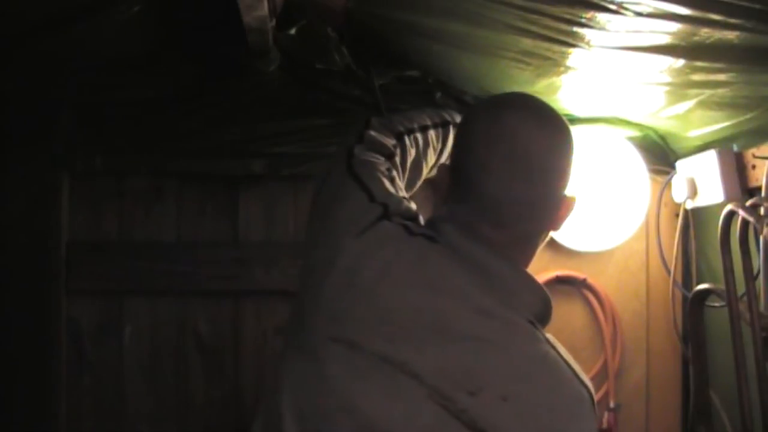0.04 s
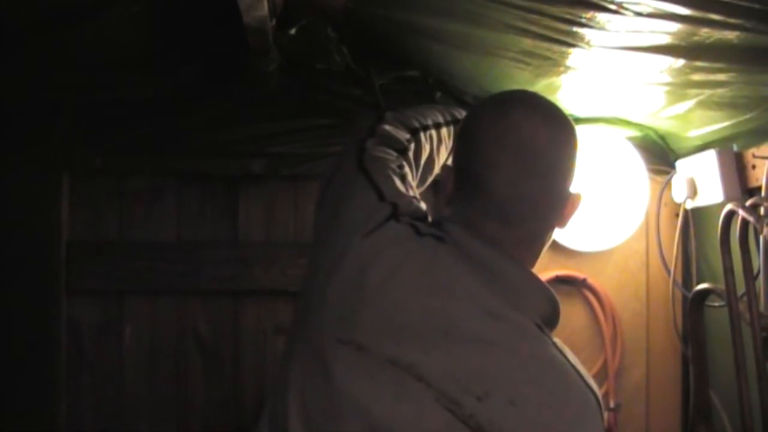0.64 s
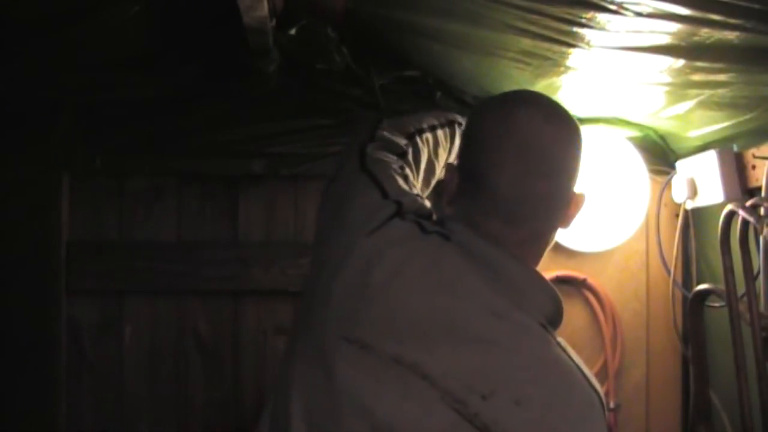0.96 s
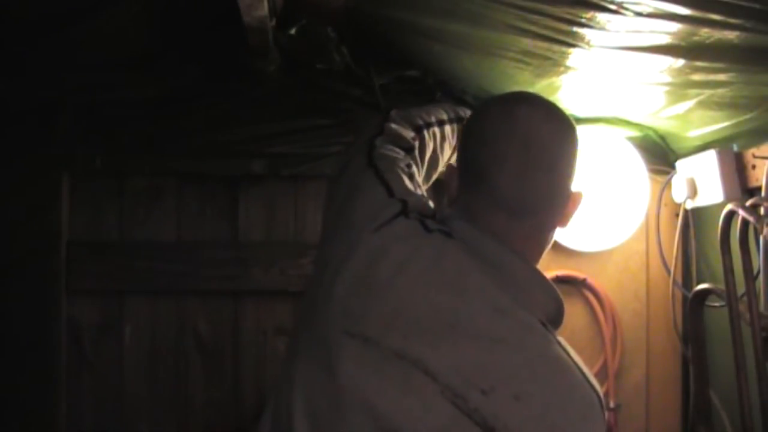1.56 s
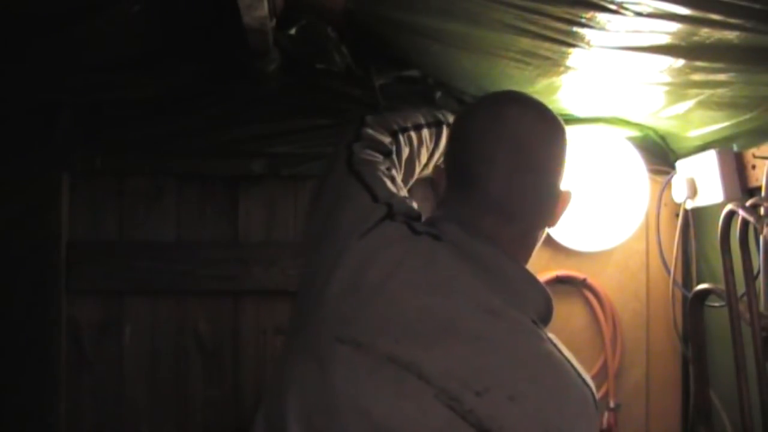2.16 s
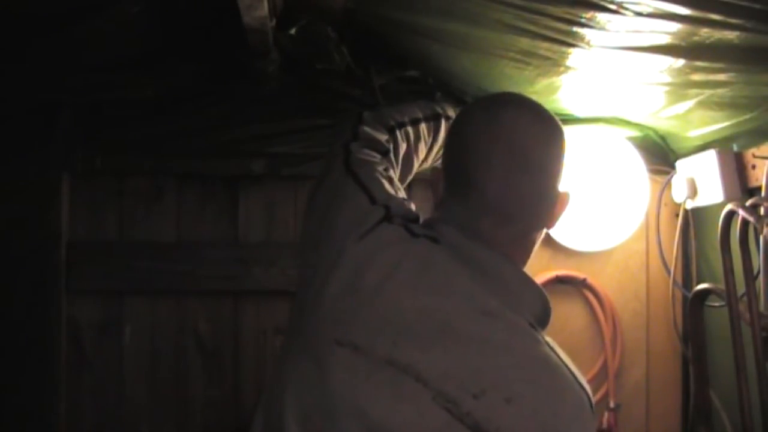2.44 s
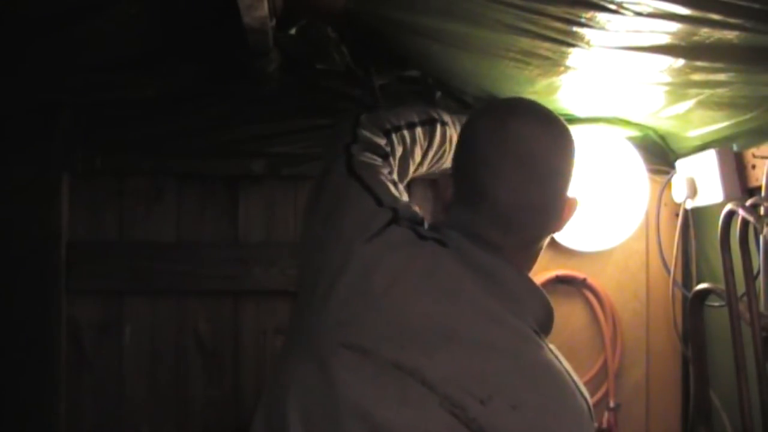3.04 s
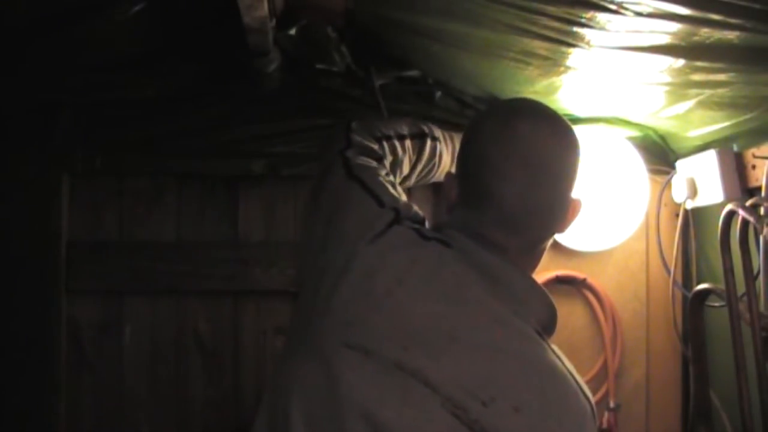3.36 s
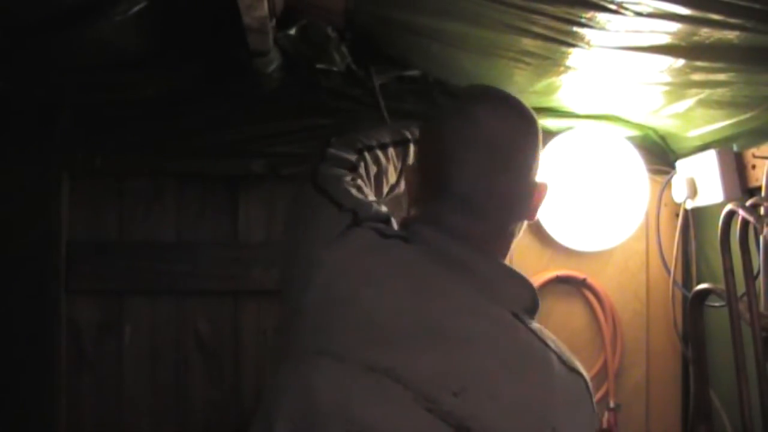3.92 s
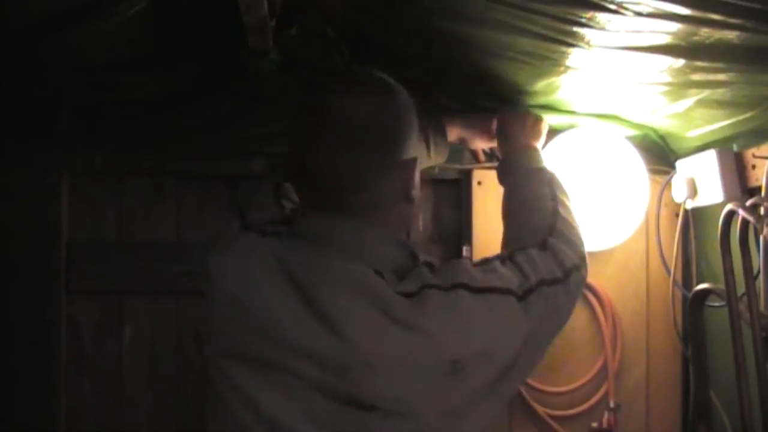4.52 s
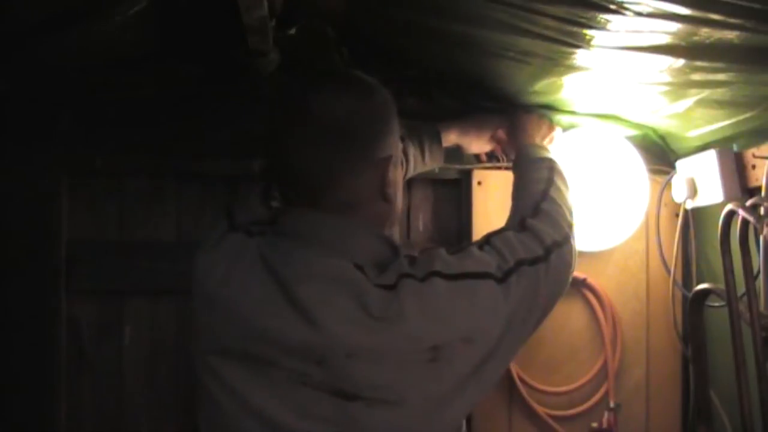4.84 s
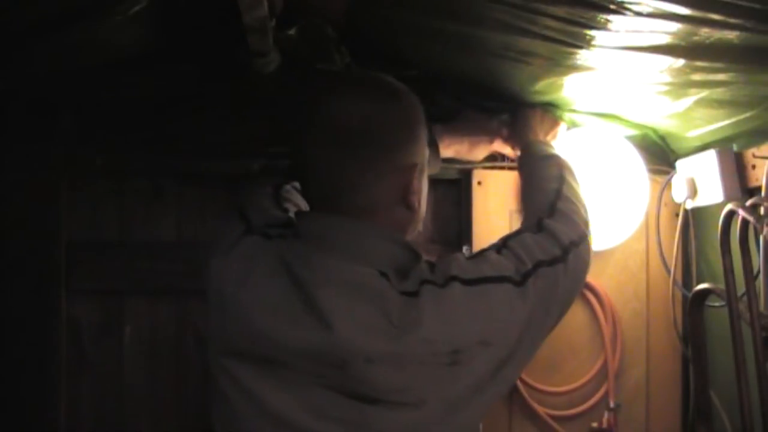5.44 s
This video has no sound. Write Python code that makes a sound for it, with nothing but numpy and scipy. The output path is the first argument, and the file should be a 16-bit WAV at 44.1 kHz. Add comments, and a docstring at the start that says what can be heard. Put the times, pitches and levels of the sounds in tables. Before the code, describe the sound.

Quiet, uneven rustling of clothing and cables sliding over plastic lining is heard from nearby inside a cramped wooden shed, dotted with small taps and faint scrapes. Past the middle comes one loud knock on the boards, followed by a busy run of sharp clicks and lighter knocks as wires spring against a plastic box. A soft hiss of still air and a barely audible high whine lie underneath.

```python
"""Someone works on cables under the roof of a small wooden shed lined with plastic sheeting.
At first, sliding friction: a jacket swishes, hands and cables rub the lining, amid light bumps and ticks.
Near 3.9 s a hard bump sets the modes of the boards ringing. Then, to the end, wires snap in quick
succession against a plastic box, each a sudden release that excites a resonance.
Throughout, the shed reverberates briefly and the equipment whines faintly over still air."""
import sys
import numpy as np
from scipy import signal
from scipy.fft import rfft, irfft
from scipy.io import wavfile

SR = 44100
rng = np.random.default_rng(int(sys.argv[2]) if len(sys.argv) > 2 else 0)


def pcm_store(signal):
    """Save signal as 16-bit PCM."""
    levels = np.round(np.clip(np.atleast_2d(signal), -1, 1) * 32767)
    wavfile.write(sys.argv[1], SR, levels.astype(np.int16).T)


N = 246519
TIME = np.arange(N) / SR


def rustle():
    """Sliding friction: cloth and sheeting hiss, cables rasp on the lining and rumble in the boards."""
    # spectrum of each kind of friction: frequency_hz, relative_db
    swish_colour = [(600, -23), (1500, -0.5), (2800, -2), (4000, -1), (5300, -0.5), (7000, -2.5),
                    (10000, -2), (12000, -6.5), (13500, -14), (16000, -23)]
    rub_colour = [(200, -24), (330, -18), (400, -7), (520, 2), (660, 3), (800, 0), (980, 1.5), (1150, -1.5),
                  (1400, 0), (2000, -5), (3200, -5.5), (6000, -40)]
    drag_colour = [(20, -48), (50, -43), (100, -7), (160, -6.5), (215, 1.5), (270, 4), (320, -8),
                   (385, 12.5), (480, -14), (800, -19)]
    swish = from_db(1.58) * friction(effort(0), swish_colour, slips_per_s=24000, spread_db=0)
    rub = from_db(-3) * friction(effort(1), rub_colour, slips_per_s=1500, spread_db=-0.5)
    drag = from_db(-4) * friction(effort(2), drag_colour, slips_per_s=1000, spread_db=-0.5)
    return swish + shed(rub + drag, wet_db=1)


def effort(layer, swell_shape=1.68):
    """Incoherent addition: arm movements sum in power to one layer's gain (0 swish, 1 rub, 2 drag)."""
    # arm movements, relative levels: peak_s, rise_s, fall_s, swish_db, rub_db, drag_db
    strokes = [(0.03, .15, 0.11, -54.5, -50.5, -56.5), (0.086, 0.023, 0.046, -46.5, -51, -75),
               (0.25, 0.13, 0.22, -53.5, -55.5, -60), (0.56, 0.038, 0.045, -49, -55.5, -68),
               (0.63, 0.034, .09, -52, -51.5, -62), (0.821, 0.14, .075, -56.5, -58, -63),
               (1.12, .13, 0.061, -47, -49.5, -56.5), (1.22, .04, .04, -50, -54, -57.5),
               (1.57, 0.23, 0.065, -48.5, -49, -54), (1.744, .02, .04, -50.5, -53, -44.5),
               (1.83, .05, .05, -57, -53.5, -64), (1.93, 0.062, 0.1, -47, -51, -60.5),
               (2.17, 0.069, 0.095, -52.5, -48, -51), (2.322, 0.064, 0.11, -50, -47, -50.5),
               (2.51, 0.092, 0.05, -47.5, -46, -58), (2.701, 0.069, 0.047, -58, -55.5, -55),
               (2.99, 0.095, 0.13, -58.5, -57.5, -68), (3.219, 0.041, 0.054, -55, -53.5, -51.5),
               (3.33, 0.059, 0.12, -47.5, -52.5, -60.5), (3.438, 0.039, .04, -51.5, -47, -62),
               (3.55, 0.091, 0.12, -42.5, -54.5, -59), (3.882, 0.15, 0.064, -39, -46.5, -53),
               (4.03, .03, .07, -64, -52.5, -63), (4.25, 0.16, 0.23, -56, -52, -67),
               (4.6, 0.19, 0.082, -57, -69, -79.5), (4.8, 0.064, 0.15, -42.5, -45, -63),
               (5.222, 0.081, .09, -45.5, -42.5, -63), (5.42, 0.071, 0.13, -53, -48, -57.5)]
    # slight motion between them, relative levels: swish_db, rub_db, drag_db
    fidget_db = (-66.5, -64, -77.5)
    power = from_db(fidget_db[layer]) ** 2
    for peak_s, rise_s, fall_s, *levels_db in strokes:
        from_peak = np.abs(TIME - peak_s) / np.where(TIME < peak_s, rise_s, fall_s)
        swell = np.exp(-np.minimum(from_peak ** swell_shape, 20))   # a bell, pointed for shapes below 2
        power = power + (from_db(levels_db[layer]) * swell) ** 2
    return np.sqrt(power)


def friction(gain, colour, slips_per_s, spread_db):
    """Stick-slip: sliding is a shower of tiny uneven slips; firmer movement makes more of them."""
    chance = np.minimum(slips_per_s * np.sqrt(rms_one(gain)) / SR, 1)
    sizes = from_db(spread_db * np.minimum(rng.exponential(1, N), 4)) * rng.standard_normal((2, N))
    slips = sizes * (rng.random(N) < chance) / np.sqrt(chance)
    return gain * coloured(ports(slips), colour)


def snaps(direct_db=6, wet_db=8.5, roof_echo_s=0.0047, roof_echo_db=-5.5, box_db=-8, crackle_s=0.0013):
    """Impulse excitation: a sudden release rings a wire and jolts its box; the roof echoes it once."""
    # wires, clips and creases snapping: start_s, relative_db, pitch_hz, bandwidth_hz
    releases = [(1.217, -33, 2000, 2030), (1.7198, -23, 2200, 4000), (1.7235, -25, 2660, 4000),
                (1.833, -37, 2500, 2000), (1.904, -31, 3500, 5000), (2.683, -34.5, 3900, 7000),
                (3.149, -35.5, 5960, 9000), (3.2025, -33, 2210, 4000), (3.623, -50, 2280, 2500),
                (3.856, -16.5, 3370, 4000), (3.9, -20, 4900, 6000), (3.976, -23.5, 2600, 5000),
                (4.0216, -23.5, 4040, 7050), (4.2582, -22, 4460, 3600), (4.341, -22, 2770, 2980),
                (4.351, -25, 2980, 3000), (4.367, -27.5, 3000, 3000), (4.51, -19.5, 3540, 4100),
                (4.7158, -29.5, 4200, 6000), (4.734, -19, 3860, 5000), (4.753, -25, 4500, 5000),
                (4.772, -27, 5500, 8000), (4.7937, -11.5, 8460, 12300), (4.841, -10, 8000, 6600),
                (4.8457, -29, 7500, 5000), (4.905, -24, 3500, 6000), (5.0024, -30, 3040, 5900),
                (5.093, -29.5, 3460, 6000), (5.1648, -22.5, 1660, 1500), (5.2096, -13.5, 4570, 1800),
                (5.2562, -19, 5800, 4070), (5.273, -20.5, 4870, 8000), (5.325, -16.5, 2760, 3970),
                (5.3917, -16, 8000, 14700), (5.423, -25, 2630, 3000), (5.442, -40, 2980, 4950),
                (5.5457, -32, 3070, 6900)]
    out, t = np.zeros((2, N)), TIME[:SR // 50]
    for start_s, relative_db, pitch_hz, bandwidth_hz in releases:
        crackle = 0.24 * rng.standard_normal(len(t)) * np.exp(-t / crackle_s)
        release = (t == 0) + crackle
        wire = resonance(release, pitch_hz, bandwidth_hz)
        box = from_db(box_db) * butter(release, [900, 3200], "band")
        # thick, low-pitched parts let go more slowly and so lack treble
        snap = butter(wire + box, 3.8 * pitch_hz, "low")
        snap = butter(snap, 12800, "low", order=8)
        snap = from_db(relative_db) * snap / np.linalg.norm(snap)
        add(out, start_s, from_db(direct_db) * snap)
        add(out, start_s + roof_echo_s, from_db(roof_echo_db) * snap)
        add(out, start_s, from_db(wet_db) * reflections(snap))
    return out


def knocks(ring_db=-3, thud_db=5, thud_low_hz=390, thud_top_hz=1400):
    """Impact: each bump rings the boards and scatters a thud round the shed; softer contact is duller."""
    # bumps on the boards: start_s, relative_db, cutoff_hz, rebound_t60_s
    bumps = [(0.268, -39, 890, .02), (0.382, -37, 900, .05), (0.848, -40, 1500, 0.045),
             (1.108, -39, 1200, .02), (1.22, -36.5, 2000, .02), (1.29, -39.5, 1500, .02),
             (1.41, -34, 895, .02), (1.7195, -31, 2300, 0.11), (1.738, -33, 600, .04),
             (1.904, -38, 1800, .02), (2.323, -38, 900, 0.11), (2.618, -40, 1400, .05),
             (2.684, -42, 1190, .02), (3.2035, -34, 1400, .02), (3.625, -35.5, 2200, 0.038),
             (3.8496, -16.5, 1096, .01), (3.854, -12.5, 2300, .01), (3.8587, -11.5, 1610, .01),
             (3.8657, -6, 580, .01), (3.869, -10, 2241, .01), (3.8815, -16.4, 1309, .01),
             (3.9193, -27, 2002, .02), (3.976, -34, 1510, .02), (4.229, -38.5, 900, 0.018),
             (4.341, -33, 1640, .17), (4.795, -31, 1610, 0.13), (5.003, -40.5, 2000, 0.023),
             (5.09, -37.5, 1200, 0.016), (5.164, -40, 2020, .02), (5.2102, -30.5, 1990, 0.17),
             (5.2359, -23.5, 1980, 0.041), (5.3252, -22.5, 2970, 0.057), (5.3447, -26.5, 1700, 0.17),
             (5.393, -29, 1610, .03), (5.544, -34.5, 1690, 0.015)]
    force, scattered = np.zeros(N), np.zeros((2, N))
    for start_s, relative_db, cutoff_hz, rebound_t60_s in bumps:
        push = from_db(relative_db) * rattle(cutoff_hz, rebound_t60_s)
        thud = butter(push, thud_low_hz, "high", order=3)
        thud = butter(thud, thud_top_hz, "low", order=3) * SR / (2 * thud_top_hz)
        add(force, start_s, push)
        add(scattered, start_s, reflections(thud))
    return from_db(ring_db) * boards(force) + from_db(thud_db) * scattered


def rattle(cutoff_hz, t60_s, contacts=5, gap_s=0.012, unevenness=0.304):
    """Inelastic rebound: a bumped cable strikes again at uneven intervals, each time more weakly."""
    gaps_s = gap_s * (1 + unevenness * rng.uniform(-1, 1, contacts))
    force = np.zeros(SR // 8)
    for contact_s in np.cumsum(gaps_s) - gaps_s[0]:
        click = signal.unit_impulse(len(force), round(contact_s * SR))
        force += from_db(-60 * contact_s / t60_s) * butter(click, cutoff_hz, "low")
    return force


def boards(force):
    """Modal superposition: the boards' modes add with alternating signs; the lowest radiate poorly."""
    # modes of the boards: pitch_hz, relative_db, t60_s
    modes = [(74.7, -27.5, 0.54), (168, -35.5, 0.54), (232, -29.5, 0.35), (366.7, -22, 0.19),
             (413, -21, 0.17), (455, -9.5, 0.06), (507.3, -18, 0.27), (562, -26.5, 0.34), (660, -7.5, 0.13),
             (736, -9.5, 0.14), (770, -16, 0.057), (784, -24.5, 0.32), (860, -19.5, 0.39),
             (949, -16.5, 0.19), (1040, -20, 0.15), (1116, -27, 0.49), (1177, -8, 0.045),
             (1295, -22.5, 0.28), (1493, 0.5, 0.011), (1405, -36, 0.21), (1565, -15.5, 0.2),
             (1525, -11.5, 0.11), (1768, -14, 0.086), (2100, -17, 0.16), (2205, -18.5, 0.052)]
    rings = sum((-1) ** k * from_db(db) * ring(force, hz, t60_s)
                for k, (hz, db, t60_s) in enumerate(modes))
    return butter(rings, 250, "high")


def scrapes():
    """Forced resonance: a sliding cable's slips drive one resonance of the lining, swelling and fading."""
    # briefly pitched scrapes: start_s, length_s, level_db, pitch_hz, bandwidth_hz
    slides = [(0.143, 0.067, -54.5, 950, 152), (0.497, 0.26, -52.5, 1220, 380),
              (0.512, 0.16, -56, 2930, 700), (1.046, 0.077, -51, 990, 200), (1.211, 0.025, -47, 1790, 700),
              (1.895, 0.056, -51, 5700, 900), (2.219, 0.28, -58, 660, 90), (2.223, 0.29, -56, 1500, 250),
              (2.278, 0.084, -50, 960, 160), (2.886, 0.059, -53, 870, 180), (3.151, 0.046, -49.5, 810, 250),
              (3.619, 0.034, -41, 1930, 1760), (4.328, 0.075, -49.5, 3080, 2580),
              (4.755, 0.046, -43, 1470, 400)]
    out = np.zeros(N)
    for start_s, length_s, level_db, pitch_hz, bandwidth_hz in slides:
        size = round(length_s * SR)
        slips = rng.standard_normal(SR)[:size]
        lining = resonance(slips, pitch_hz, bandwidth_hz)
        lining = resonance(lining, pitch_hz, 2 * bandwidth_hz)   # steepens the skirts
        swell = np.sqrt(np.hanning(size))
        add(out, start_s, from_db(level_db) * rms_one(lining) * swell)
    return shed(out, wet_db=-3)


def shed(x, wet_db):
    """Superposition: the direct sound plus the shed's reverberant field."""
    return x + from_db(wet_db) * reflections(x)[:, :N]


def reflections(x, build_s=0.00067, wall_cut_hz=12000):
    """Diffuse reverberation: near walls return a wash, longest in the bass and unique to each spot."""
    # reverberation time of the shed: frequency_hz, t60_s
    shed_t60 = [(100, 0.43), (600, 0.21), (2000, 0.1), (6000, 0.16), (14000, 0.2)]
    t = TIME[:2 ** 14]
    wash, tail = rfft(port_noise(len(t))), 0
    octave = np.round(np.log2(np.maximum(bins(t), 200)))
    onset = 1 - np.exp(-t / build_s)
    for k in np.unique(octave):
        band = irfft(wash * (octave == k), len(t))
        envelope = onset * from_db(-60 * t / at_hz(shed_t60, 2 ** k))
        tail = tail + band * envelope / np.linalg.norm(envelope)
    return signal.fftconvolve(np.atleast_2d(x), butter(tail, wall_cut_hz, "low"), axes=1)


def background(air_db=-58, whine_db=-76.5, whine_hz=15625):
    """Stationary background: broadband noise of still air and the equipment's thin pure tone."""
    # spectrum of the still air: frequency_hz, relative_db
    air_colour = [(20, -34), (50, -17), (150, 2), (400, 5.5), (900, 11), (2000, 4.5), (5000, -3),
                  (11000, -2), (16000, -25)]
    air = from_db(air_db) * coloured(port_noise(N), air_colour)
    whine = from_db(whine_db) * np.sqrt(2) * np.sin(2 * np.pi * whine_hz * TIME)
    return air + whine


def ports(pair):
    """Spatial coherence: two close microphone ports hear diffuse sound alike in bass, unlike in treble."""
    # likeness of the two ports: frequency_hz, coherence (0 to 1)
    likeness = [(60, 0.89), (300, 0.95), (1400, 0.94), (3100, 0.89), (5000, 0.76), (8000, 0.27),
                (15000, 0.04)]
    mid, side = rfft(pair)
    coherence = at_hz(likeness, bins(pair))
    common = np.sqrt((1 + coherence) / 2) * mid
    opposed = np.sqrt((1 - coherence) / 2) * side * [[1], [-1]]
    return irfft(common + opposed, pair.shape[-1])


def port_noise(size):
    """Diffuse white noise at the two ports."""
    return ports(rng.standard_normal((2, size)))


def ring(force, hz, t60_s):
    """Damped oscillator: a unit impulse starts a decaying sine of height 1."""
    radius, angle = from_db(-60 / (t60_s * SR)), 2 * np.pi * hz / SR
    return signal.lfilter([0, np.sin(angle)], [1, -2 * radius * np.cos(angle), radius ** 2], force + 1e-18)


def resonance(x, hz, width_hz):
    """Second-order resonator with gain 1 at its peak."""
    return signal.lfilter(*signal.iirpeak(hz, hz / min(width_hz, SR / 3), fs=SR), x)


def butter(x, hz, kind, order=2):
    """Causal Butterworth filter."""
    return signal.sosfilt(signal.butter(order, np.clip(hz, 10, .45 * SR), kind, fs=SR, output="sos"), x)


def coloured(x, spectrum):
    """Spectral shaping of a steady texture, scaled to rms 1."""
    return rms_one(irfft(rfft(x) * from_db(at_hz(spectrum, bins(x))), x.shape[-1]))


def at_hz(points, hz):
    """Interpolate a table on a log-frequency axis."""
    known_hz, values = np.transpose(points)
    return np.interp(np.log(hz + 1), np.log(known_hz), values)


def bins(x):
    """Frequencies of the spectrum of x."""
    return np.fft.rfftfreq(x.shape[-1], 1 / SR)


def from_db(db):
    """Decibels to gain."""
    return 10 ** (np.asarray(db) / 20)


def rms_one(x):
    """Scale to rms 1."""
    return x / np.sqrt(np.mean(x ** 2) + 1e-20)


def add(track, start_s, sound):
    """Mix a short mono or stereo sound in at start_s."""
    at = round(start_s * SR)
    track[..., at:at + sound.shape[-1]] += sound[..., :max(N - at, 0)]


def scene():
    """Superposition of all the handling and the quiet of the shed."""
    return rustle() + scrapes() + snaps() + knocks() + background()


def record(dry, cutoff_hz=15900):
    """Microphone response: the right port is a little stronger, and a steep low-pass cuts the top."""
    # imbalance of the ports: frequency_hz, left_minus_right_db
    balance = [(100, -.5), (8000, -0.44), (14000, -3)]
    port_gains = from_db(at_hz(balance, bins(dry)) * [[.5], [-.5]])
    tilted = irfft(rfft(dry) * port_gains, N)
    return signal.sosfilt(signal.ellip(10, .1, 80, cutoff_hz, fs=SR, output="sos"), tilted)


dry = scene()
out = record(dry)
pcm_store(out)
```